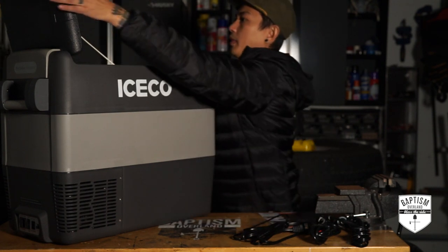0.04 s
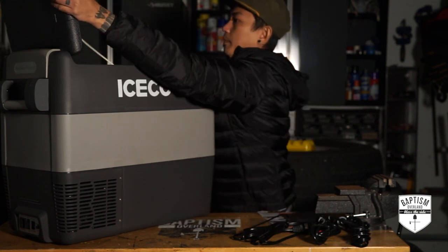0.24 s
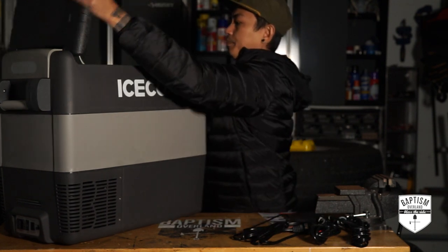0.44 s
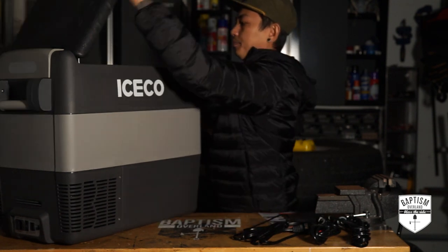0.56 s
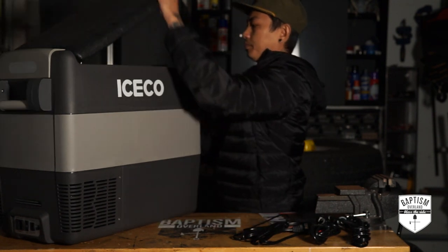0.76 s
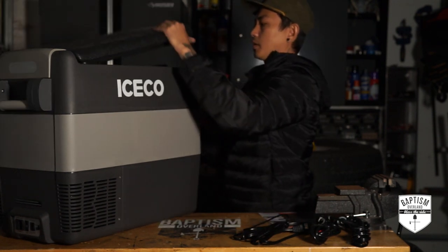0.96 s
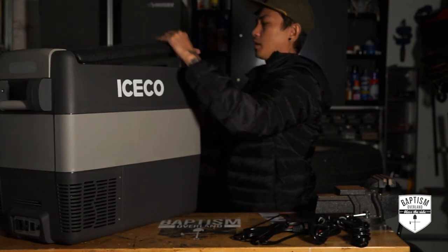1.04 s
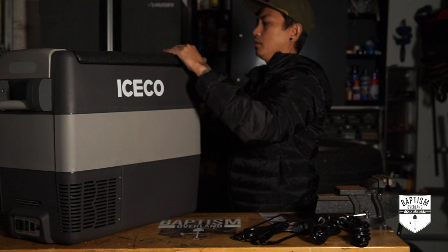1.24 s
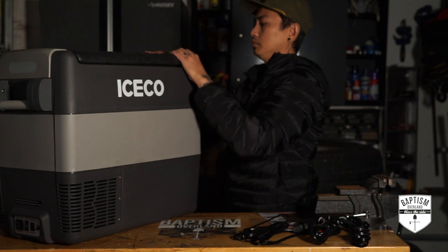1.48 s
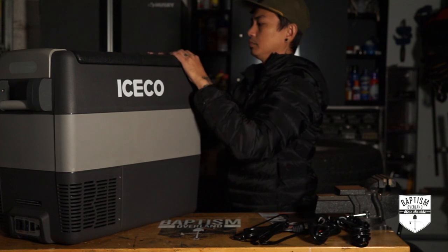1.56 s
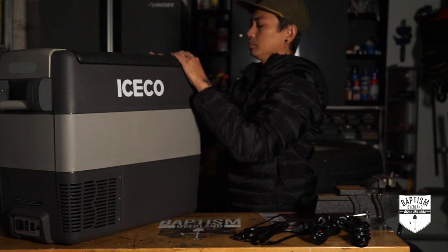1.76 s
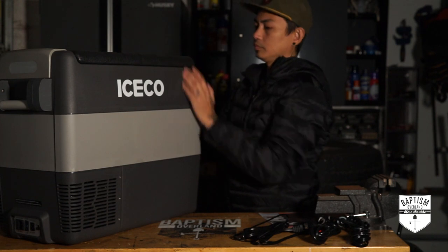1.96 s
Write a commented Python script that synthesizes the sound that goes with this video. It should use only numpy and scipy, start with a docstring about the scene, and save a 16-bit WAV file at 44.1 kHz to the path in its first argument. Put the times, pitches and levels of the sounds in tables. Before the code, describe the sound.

Plastic cooler lid shuts with a deep hollow knock, then latches with a brighter snap

```python
"""Portable fridge lid shut in a garage

The hinge creaks by stick and slip and a nylon sleeve swishes (grainy noise) as the plastic lid comes down.
It lands with a deep knock of dying box modes and dense ring; its edge clacks on the rim.
Damped ticks mark the latch under the hand; it snaps home with a second, brighter knock.
The recorder's limiter ducks each knock and recovers, written as a set gain curve, bass last.
Hollow bumps, faint brushes of cloth, a short reverberation and still air complete the garage."""
import sys
import numpy as np
from scipy import signal
from scipy.fft import rfft, irfft, next_fast_len
from scipy.io import wavfile

SR = 44100
rng = np.random.default_rng(int(sys.argv[2]) if len(sys.argv) > 2 else 0)


def inscribe(sig):
    """Save sig as 16-bit PCM at rate SR to the path in sys.argv[1].

    A 1-D sig is mono; a 2-D sig holds one channel per row.
    Samples are clipped to [-1, 1] before scaling.
    """
    pcm = np.round(np.clip(np.atleast_2d(sig).T, -1, 1) * 32767)
    wavfile.write(sys.argv[1], SR, pcm.astype(np.int16))


N = 88861
TIME_S = np.arange(N) / SR
FFT_SIZE = next_fast_len(N, real=True)
FREQS_HZ = np.maximum(np.arange(FFT_SIZE // 2 + 1) * SR / FFT_SIZE, 1)

# Knocks: (time [s], dense ring level [dB], gain recovery time [s], recovery exponent [1],
# starting gain [1], bass lag [s], top of lagging bass [Hz])
LANDING = (1.141, -24.5, 0.13, 1.26, 0.0326, 0.0959, 400)
LATCHING = (1.652, -21.5, .045, 1.7, .15, .07, 1300)
# Dense ring spectra: (frequency [Hz], density [dB per Hz])
LANDING_COLOUR = [(65, -10), (100, -1), (135, -2), (175, -7.5), (240, 2), (330, 2.5), (480, -1.5),
                  (720, 1.5), (900, -5), (1300, -5.5), (1700, -11), (2300, -10.5), (3600, -8.5),
                  (5200, -13.5), (7000, -21.5), (9500, -21.5), (13000, -31), (15800, -44)]
LATCHING_COLOUR = [(70, -22), (130, -16.5), (185, -19), (270, -5), (480, -7), (620, -0.5), (740, -2),
                   (850, -7), (1040, -0.5), (1420, 0.5), (1750, -9), (2050, -7.5), (2380, -13.5),
                   (2600, -5), (3600, -4), (5100, -4.5), (5700, -8), (6500, -6), (7700, -12), (8050, -7),
                   (8500, -11.5), (9600, -12.5), (12800, -17), (15800, -30)]
# Dense ring decay: (frequency [Hz], t60 [s])
LANDING_T60 = [(90, 0.49), (250, .41), (650, .5), (1500, 0.38), (4000, .36), (7000, 0.22), (13000, 0.15)]
LATCHING_T60 = [(90, 0.44), (250, 0.4), (650, 0.41), (1300, 0.44), (4000, 0.43), (7000, 0.46),
                (13000, 0.33)]
# Modes of lid and box: (frequency [Hz], t60 [s], landing level [dB], latching level [dB])
BOX_MODES = [(88.6, 0.32, -39, -64), (100.3, 0.31, -32.5, -60), (128, 0.38, -38.5, -56.5),
             (227.6, 0.396, -37.5, -56), (271.6, 0.36, -41.5, -44.5), (319.4, 0.4, -35.5, -48.5),
             (452, 0.43, -41.5, -50), (527.7, 0.44, -38, -54), (575, .68, -39.5, -54),
             (615, 0.4, -41.5, -41.5), (665.7, 0.4, -38, -46), (734.6, .5, -41, -42),
             (827, .58, -43.5, -52), (1022, .44, -41, -38), (1065, .42, -47, -38.5),
             (1235, 0.48, -44.5, -47), (1338, 0.44, -46, -35.5), (1437, 0.42, -44.5, -41.5),
             (2848, 0.42, -48, -47), (3570, 0.35, -48, -43), (4360, 0.45, -52, -50)]
CREST_S = 0.059  # age of a knock at which its levels and colour hold
BASS_START = 0.5  # squared, the gain with which lagging bass sets in
RATTLE_DB, RATTLE_PER_S = 1, 300
PANEL_RIPPLE_DB, PANEL_SPACING_HZ = 1.98, 45.17
RING_CENTRES_HZ = np.geomspace(60, 15000, 16)

# Lid edge on rim: (time [s], level [dB])
CLACKS = [(1.1838, -15), (1.1862, -22), (1.2182, -34), (1.2333, -23.5)]
# Clack spectrum: (frequency [Hz], density [dB per Hz])
CLACK_COLOUR = [(350, -41), (600, -10), (1380, -2), (2260, -13.5), (3600, -0.5), (5820, -10), (9390, -11),
                (10200, -15.5), (14600, -28), (15800, -39)]
CLACK_T60_S = 0.013
# Narrow ring left by one clack: (level [dB], frequency [Hz], relative width [1], t60 [s])
ZING = (-44.5, 8950, .03, .24)
ZING_S = 1.2333

# Hinge slips, then three faint catch clicks: (time [s], level [dB])
SLIPS_AND_CLICKS = [(.0905, -30), (.0935, -37), (.0992, -34), (.103, -39), (.1055, -30), (.1078, -30),
                    (.1125, -23.5), (.1145, -32), (.1168, -33), (.1207, -34), (.1235, -37), (.1365, -35),
                    (.1428, -33), (.1595, -41), (.1655, -50), (.176, -41), (.1822, -33.5), (.188, -40),
                    (.944, -61), (1.031, -56), (1.038, -58)]
# Slip, click and grind spectrum: (frequency [Hz], density [dB per Hz])
SLIP_COLOUR = [(1000, -28), (1450, -34), (2080, -0.5), (2650, -7.5), (3150, 0.5), (4000, 0.5), (4400, -7.5),
               (4850, -7.5), (5600, -2.5), (6300, -9.5), (6800, -16), (7400, -9.5), (7900, -20),
               (9300, -18), (10100, -30), (10900, -20), (12200, -26), (15800, -42)]
SLIP_T60_S = 0.016
# Hinge grind between slips: (time [s], level [dB])
GRIND = [(0, -61), (.065, -56.5), (.09, -44), (.113, -37), (.15, -52.5), (.17, -57), (.19, -49),
         (.22, -61.5), (.26, -85)]
GRIND_GRAINS_PER_S = 4000
# Hinge rumble in the hollow lid: (time [s], level [dB])
RUMBLE = [(0, -70), (.07, -66.5), (.11, -48.5), (.19, -54), (.25, -56), (.3, -75), (.42, -70), (.53, -64.5),
          (.6, -65), (.72, -74.5), (.8, -78)]
# Rumble spectrum: (frequency [Hz], density [dB per Hz])
RUMBLE_COLOUR = [(190, -7), (280, -0.5), (540, -0.5), (740, -9.5), (920, -23), (3000, -40), (15000, -70)]

# Soft bumps of the hollow lid: (time [s], level [dB], pitch [Hz], t60 [s])
BUMPS = [(.086, -43, 300, 0.083), (.114, -36.5, 424, 0.11), (.131, -37, 348, 0.081),
         (.172, -34, 268, 0.066), (.208, -36.5, 154, 0.12), (.2213, -36, 154, 0.12),
         (.2413, -37, 151, 0.05), (.239, -39.5, 570, 0.052), (.324, -49.5, 492, 0.043),
         (.519, -37, 314, .08), (.516, -46, 135, .12), (.56, -53, 150, .1), (.705, -39, 460, 0.048),
         (1.112, -54.5, 112, 0.14), (1.16, -23.5, 718, 0.074), (1.245, -29, 535, 0.058),
         (1.507, -39, 104, 0.14), (1.51, -44, 315, .12), (1.599, -42.5, 732, 0.078),
         (1.607, -39.5, 362, .1), (1.612, -42, 134, 0.11), (1.631, -29, 436, 0.076),
         (1.632, -28.5, 139.4, 0.073)]
# Bump spectrum around its pitch: (multiple of pitch [1], density [dB per Hz])
BUMP_COLOUR = [(.45, -19), (.65, -7), (1, 0), (1.6, -8.5), (2.6, -21), (8, -39), (30, -80)]
BUMP_ATTACK_S, BUMP_TONE_SHARE = 0.0055, 0.52

# One lid tick, then latch ticks: (time [s], level [dB], first, second, third ring [Hz])
TICKS = [(.702, -35, 2500, 3400, 2130), (1.501, -49.5, 11800, 3600, 4700), (1.511, -40, 5120, 3620, 6500),
         (1.518, -40, 3680, 5000, 10000), (1.5986, -31, 3130, 4500, 5520), (1.6315, -31, 4400, 2990, 6240),
         (1.637, -38, 3660, 4300, 3420)]
# Tick noise spectrum: (frequency [Hz], density [dB per Hz])
TICK_COLOUR = [(1200, -10), (2500, -8), (3100, 2.5), (3800, -3), (4500, -6), (5000, -5), (5500, -6),
               (6800, -24), (15800, -38)]
# Relative levels of a tick's rings: (level [dB])
TICK_RING_DBS = [1, -5.5, -9.5]
TICK_T60_S, TICK_ATTACK_S, TICK_TONE_SHARE = 0.015, 0.0009, 0.73

# Sleeve rub as the arm comes down: (time [s], level [dB])
ARM_DOWN = [(.43, -80), (.48, -61), (.525, -47), (.57, -47), (.62, -42.5), (.68, -43.5), (.72, -46.5),
            (.76, -58.5), (.79, -73)]
# Sleeve spectrum: (frequency [Hz], density [dB per Hz])
ARM_COLOUR = [(710, -29), (1200, -27), (1900, -25.5), (2550, -5), (3760, -5), (4670, -10), (5300, -6),
              (6890, -7.5), (8730, -1.5), (10400, -5), (11800, -6), (15800, -20)]
ARM_PATCH_DB, ARM_PATCHES_PER_S = 1.5, 24.9
CLOTH_GRAIN_DB, CLOTH_GRAINS_PER_S = 1.0, 250
PATCH_CENTRES_HZ = np.geomspace(2000, 15000, 12)

# Brushes of hand and cloth: (time [s], level [dB], half length [s], squeak [Hz], glide [Hz per s])
BRUSHES = [(0.034, -58, 0.032, 10200, 0), (.04, -61.5, .04, 3900, 0), (0.066, -62, 0.028, 7450, -3),
           (1.008, -63.5, 0.018, 4220, 3), (1.928, -51, 0.025, 11200, -18000),
           (1.973, -57.5, 0.0082, 9600, -18000)]
# Brush hiss spectrum: (frequency [Hz], density [dB per Hz])
BRUSH_COLOUR = [(1500, -10), (3000, -9), (4000, 0), (5500, -10.5), (7500, -5.5), (9500, -2.5),
                (12000, -4.5), (13500, -11), (15800, -17)]
BRUSH_WIDTH_HZ, BRUSH_SQUEAK_SHARE = 520, 0.42

# Reverberation spectrum: (frequency [Hz], density [dB per Hz])
ROOM_COLOUR = [(60, 2), (3000, -3), (7000, -1.5), (15000, -16)]
ROOM_T60_S, ROOM_DELAY_S = 0.22, 0.0047
ROOM_DB, TICK_ROOM_DB = -18, -11
# Still air spectrum: (frequency [Hz], density [dB per Hz])
AIR_COLOUR = [(60, -17), (110, -9), (150, 5), (210, -8.5), (350, -5.5), (600, -7.5), (800, -5.5),
              (1100, -9.5), (2000, -11.5), (3800, -9), (7000, -17), (10000, -20.5), (15800, -36)]
AIR_DB = -68.5
LOW_CUT_HZ, HIGH_CUT_HZ = 66, 15800


def from_db(db):
    """Decibels to gain."""
    return np.exp(np.asarray(db) * np.log(10) / 20)


def rms_one(x):
    """Scale to rms 1."""
    return x / np.sqrt(np.mean(x ** 2) + 1e-20)


def at_hz(points, hz):
    """Interpolate a table on a log-frequency axis."""
    table_hz, value = np.transpose(points)
    return np.interp(np.log(hz), np.log(table_hz), value)


def level_curve(points):
    """Gain along (time [s], level [dB]) points, silent outside them."""
    s, db = np.transpose(points)
    inside = (TIME_S >= s[0]) * (TIME_S <= s[-1])
    return from_db(np.interp(TIME_S, s, db)) * inside


def coloured(x, colour):
    """Filter to a spectrum that falls steeply below its first point; rms 1."""
    skirt = np.minimum(FREQS_HZ / colour[0][0], 1) ** 2
    response = from_db(at_hz(colour, FREQS_HZ)) * skirt
    return rms_one(irfft(rfft(x, FFT_SIZE) * response, FFT_SIZE)[:N])


def noise(colour):
    """Coloured noise of rms 1."""
    return coloured(rng.standard_normal(N), colour)


def age_of(s):
    """Seconds since an event, 0 before it."""
    return np.maximum(TIME_S - s, 0)


def dying(s, t60_s):
    """Gain that jumps to 1 and decays exponentially."""
    return (TIME_S >= s) * np.exp(-np.log(1000) * np.minimum(age_of(s) / t60_s, 10))


def struck(s, t60_s, attack_s):
    """Exponential decay with a softened onset."""
    return dying(s, t60_s) * (1 - np.exp(-age_of(s) / attack_s))


def tone(s, hz):
    """Sine of rms 1 set off at time s."""
    return np.sqrt(2) * np.sin(2 * np.pi * hz * age_of(s))


def blend(clear, rough, share):
    """Mix tone and noise at constant power."""
    return np.sqrt(share) * clear + np.sqrt(1 - share) * rough


def wobble(axis, rate):
    """Random curve of spread near 1, redrawn `rate` times per unit of the axis."""
    return 1.11 * np.interp(axis * rate, np.arange(N // 8), rng.standard_normal(N // 8))


def band_weights(centres_hz):
    """Overlapping triangular bands that sum to 1."""
    return [np.interp(FREQS_HZ, centres_hz, pick) for pick in np.eye(len(centres_hz))]


def panel_noise(colour):
    """Spectrum of coloured noise with narrow peaks of many panel resonances."""
    depth_db = PANEL_RIPPLE_DB * np.minimum(FREQS_HZ / 3000, 1)
    ripple = from_db(depth_db * wobble(FREQS_HZ, 1 / PANEL_SPACING_HZ))
    return rfft(noise(colour), FFT_SIZE) * rms_one(ripple)


def knock(event, colour, t60s, mode_dbs):
    """Box modes and a dense, rattling ring die while the limiter's ducked gain recovers, bass last."""
    s, db, recovery_s, exponent, start_gain, bass_lag_s, bass_hz = event
    first = int(s * SR)
    age = TIME_S[:N - first]

    def limiter_gain(t):
        return np.minimum(start_gain + (t / recovery_s) ** exponent, 1)

    def envelope(hz, t60_s):
        lag_s = bass_lag_s / (1 + (hz / bass_hz) ** 2) + 1 / SR
        onset = np.minimum(BASS_START + age / lag_s, 1) ** 2
        return onset * np.exp(-np.log(1000) * (age - CREST_S) / t60_s)

    spectrum = panel_noise(colour)
    ring, modes = 0, 0
    for hz, weight in zip(RING_CENTRES_HZ, band_weights(RING_CENTRES_HZ)):
        band = irfft(spectrum * weight, FFT_SIZE)[first:N]
        ring = ring + band * envelope(hz, at_hz(t60s, hz))
    for (hz, t60_s, *_), mode_db in zip(BOX_MODES, mode_dbs):
        modes = modes + from_db(mode_db) * tone(s, hz)[first:] * envelope(hz, t60_s)
    rattle = from_db(db + RATTLE_DB * wobble(age, RATTLE_PER_S))
    body = rattle * ring + modes
    return np.pad(body * limiter_gain(age) / limiter_gain(CREST_S), (first, 0))


def contacts(rows, colour, t60_s):
    """Short hard contacts: bursts of closely packed, quickly damped modes."""
    texture = irfft(panel_noise(colour), FFT_SIZE)[:N]
    return texture * sum(from_db(db) * dying(s, t60_s) for s, db in rows)


def clacks():
    """Lid edge hits the rim and leaves a high, narrow ring."""
    db, hz, width, t60_s = ZING
    zing = noise([(hz / 2, -70), (hz * (1 - 2 * width), -25), (hz, 0),
                  (hz * (1 + 2 * width), -25), (hz * 2, -70)])
    return contacts(CLACKS, CLACK_COLOUR, CLACK_T60_S) + from_db(db) * dying(ZING_S, t60_s) * zing


def hinge_and_catch():
    """Stick-slip over a grind of tiny slips and a low rumble; three faint catch clicks follow."""
    grains = rng.standard_normal(N) * (rng.random(N) < GRIND_GRAINS_PER_S / SR)
    grind = level_curve(GRIND) * coloured(grains, SLIP_COLOUR)
    rumble = level_curve(RUMBLE) * noise(RUMBLE_COLOUR)
    return contacts(SLIPS_AND_CLICKS, SLIP_COLOUR, SLIP_T60_S) + grind + rumble


def bumps():
    """Soft pushes make the hollow lid sound briefly around one pitch."""
    out = 0
    for s, db, hz, t60_s in BUMPS:
        rough = noise([(hz * multiple, level_db) for multiple, level_db in BUMP_COLOUR])
        body = blend(tone(s, hz), rough, BUMP_TONE_SHARE)
        out = out + from_db(db) * body * struck(s, t60_s, BUMP_ATTACK_S)
    return out


def small_ticks():
    """Small clicks of noise, each with three short damped rings."""
    click, out = noise(TICK_COLOUR), 0
    gains = from_db(TICK_RING_DBS)
    gains = gains / np.linalg.norm(gains)
    for s, db, *rings_hz in TICKS:
        rings = sum(gain * tone(s, hz) for gain, hz in zip(gains, rings_hz))
        body = blend(rings, click, TICK_TONE_SHARE)
        out = out + from_db(db) * body * struck(s, TICK_T60_S, TICK_ATTACK_S)
    return out


def sleeve():
    """Nylon slides over nylon: one long, grainy swish whose colour shifts with the folds."""
    spectrum = rfft(noise(ARM_COLOUR), FFT_SIZE)
    swish = 0
    for weight in band_weights(PATCH_CENTRES_HZ):
        patch = from_db(ARM_PATCH_DB * wobble(TIME_S, ARM_PATCHES_PER_S))
        swish = swish + irfft(spectrum * weight, FFT_SIZE)[:N] * patch
    grain = from_db(CLOTH_GRAIN_DB * wobble(TIME_S, CLOTH_GRAINS_PER_S))
    return level_curve(ARM_DOWN) * swish * grain


def brushes():
    """Rubbed weave hisses and squeaks faintly in a narrow band; the last two squeaks glide down."""
    hiss, out = noise(BRUSH_COLOUR), 0
    lowpass = signal.butter(2, BRUSH_WIDTH_HZ, fs=SR, output="sos")
    waver = rms_one(signal.sosfilt(lowpass, rng.standard_normal(N)))
    for s, db, half_s, hz, glide_hz_per_s in BRUSHES:
        t = TIME_S - s
        cycles = (hz + glide_hz_per_s * t / 2) * t
        squeak = np.sqrt(2) * waver * np.sin(2 * np.pi * cycles)
        stroke = np.exp(-0.5 * (t / half_s) ** 2)
        out = out + from_db(db) * stroke * blend(squeak, hiss, BRUSH_SQUEAK_SHARE)
    return out


def garage(x):
    """Short, slightly dull reverberation: convolution with decaying noise of unit energy."""
    tail = noise(ROOM_COLOUR) * dying(ROOM_DELAY_S, ROOM_T60_S)
    return signal.fftconvolve(x, tail / np.sqrt(np.sum(tail ** 2)))[:N]


def still_air():
    """Steady coloured noise of the quiet garage."""
    return from_db(AIR_DB) * noise(AIR_COLOUR)


def scene():
    """Sum knocks, small lid sounds with their room, cloth and still air."""
    _, _, landing_dbs, latching_dbs = np.transpose(BOX_MODES)
    landing = knock(LANDING, LANDING_COLOUR, LANDING_T60, landing_dbs)
    latching = knock(LATCHING, LATCHING_COLOUR, LATCHING_T60, latching_dbs)
    small, ticks = clacks() + hinge_and_catch() + bumps(), small_ticks()
    room = garage(from_db(ROOM_DB) * small + from_db(TICK_ROOM_DB) * ticks)
    cloth = sleeve() + brushes()
    return (landing + latching + small + ticks + room + cloth + still_air())[None]


def record(dry):
    """The microphone drops the deep bass; the top is cut steeply."""
    highpass = signal.butter(4, LOW_CUT_HZ, "high", fs=SR, output="sos")
    lowpass = signal.ellip(12, 0.1, 80, HIGH_CUT_HZ, fs=SR, output="sos")
    return signal.sosfilt(lowpass, signal.sosfilt(highpass, dry))


dry = scene()
out = record(dry)
inscribe(out)
```